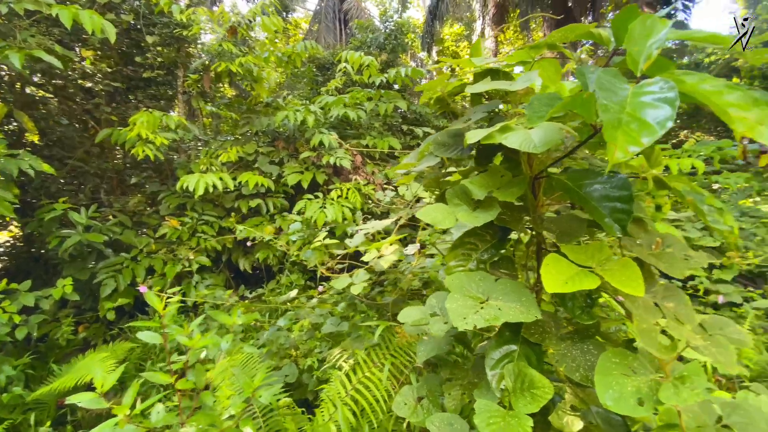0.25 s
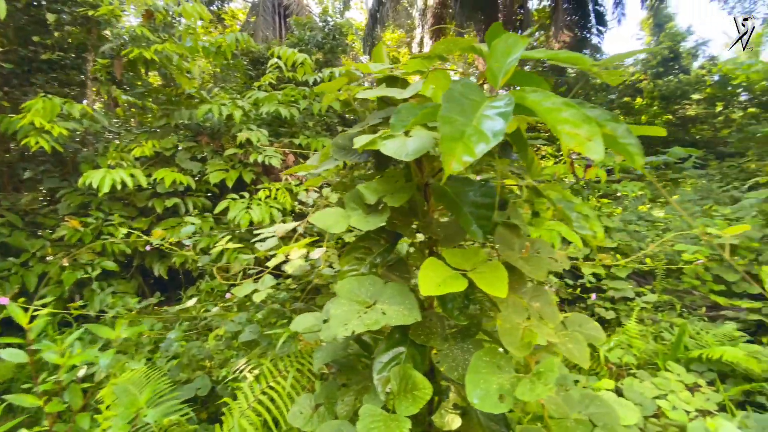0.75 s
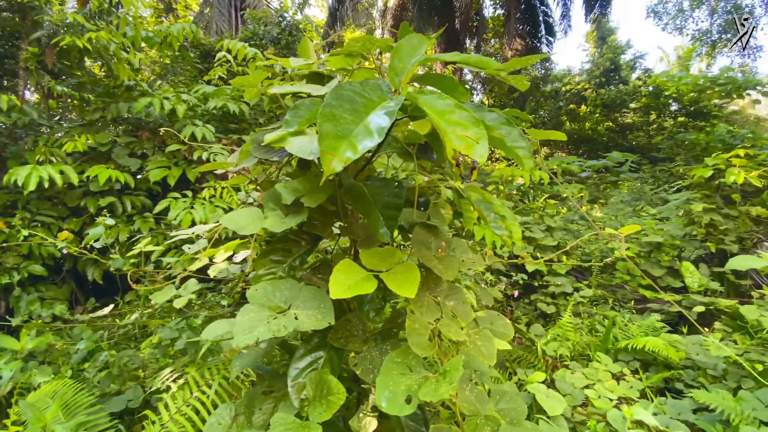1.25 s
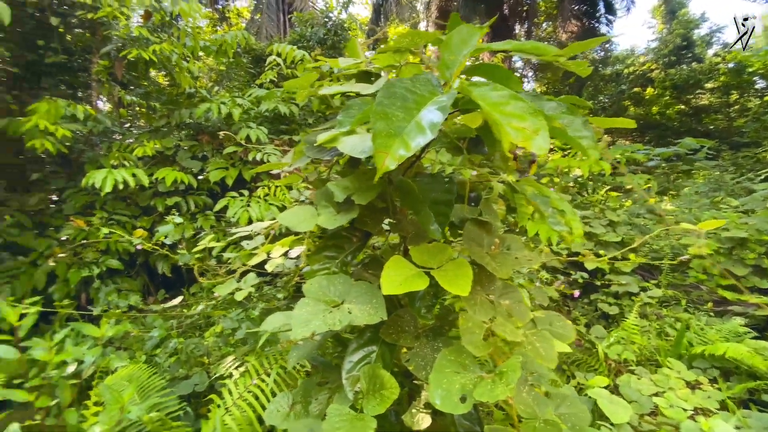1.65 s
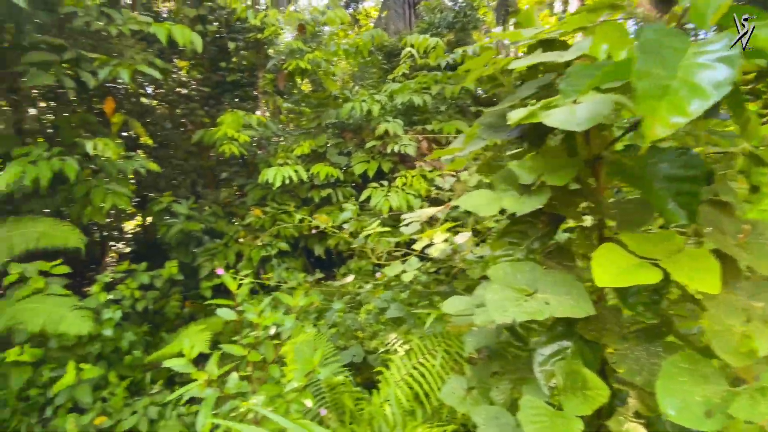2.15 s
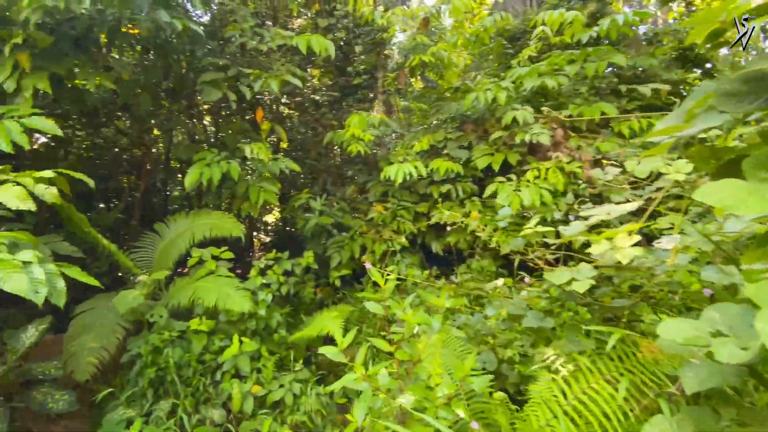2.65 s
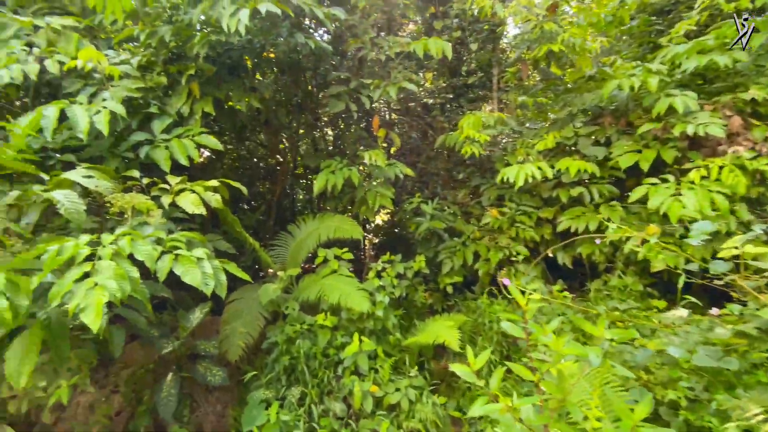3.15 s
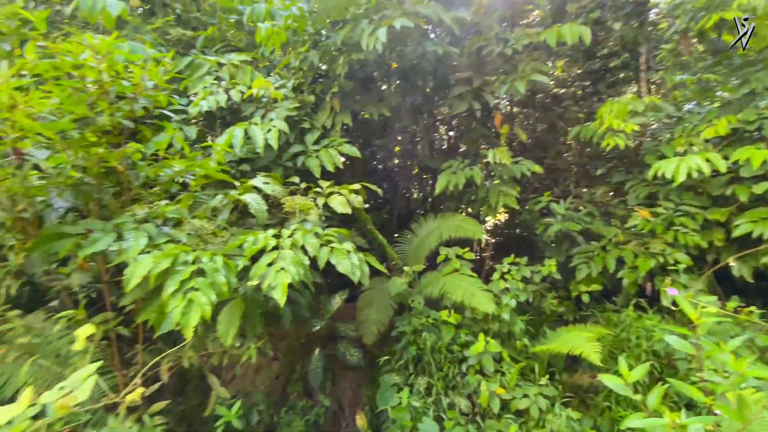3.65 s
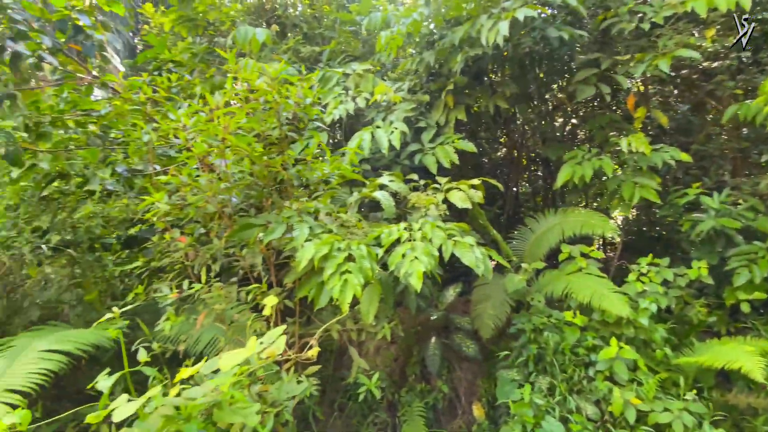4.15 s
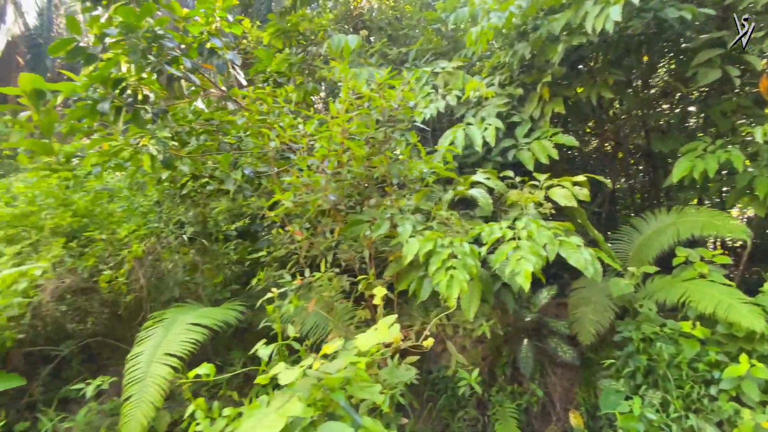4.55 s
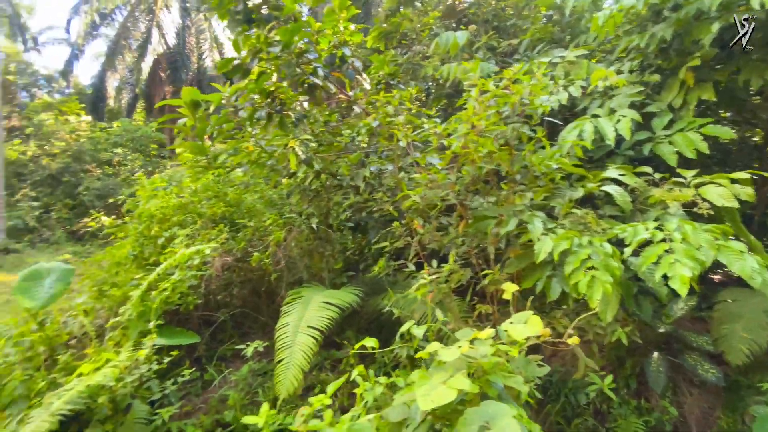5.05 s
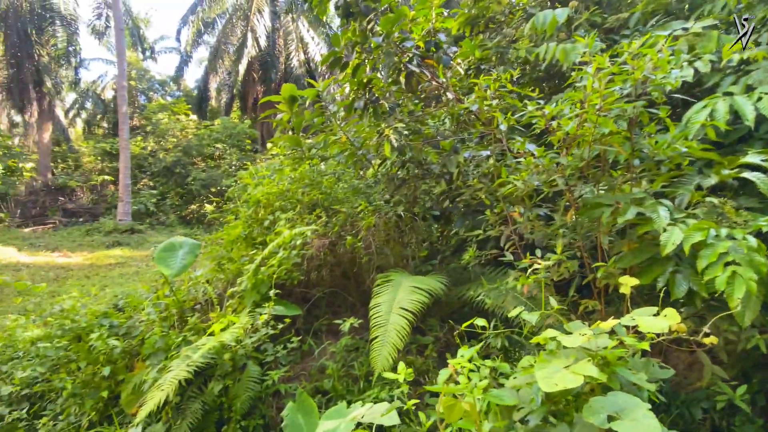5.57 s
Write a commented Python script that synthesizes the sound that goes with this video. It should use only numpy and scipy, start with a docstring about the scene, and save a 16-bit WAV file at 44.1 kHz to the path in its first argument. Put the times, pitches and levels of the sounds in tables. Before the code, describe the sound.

Heard through a phone in dense tropical foliage, a steady shrill of cicadas and trilling crickets surrounds one near cricket, whose rapid chirps grow louder toward the middle. After some soft brushing of plants come gentle footsteps, with rustling leaves, small twig snaps and two dull stick knocks. A bird slips in one brief downward whistle. Far traffic rumbles underneath the whole time.

```python
"""A cricket close by at a tropical forest edge, scraping its wings in three-stroke chirps.
The microphone is a phone, turned slowly among the leaves. Farther back are more of its kind, tree
crickets, a small triller, cicada tymbals and a high insect hiss. Plants swish, leaves and sticks give
underfoot, and a bird slurs one note. Far engines drone under the tyre wash of a distant road."""
import sys
import numpy as np
from scipy import signal
from scipy.fft import rfft, irfft, next_fast_len
from scipy.io import wavfile

SR = 44100
rng = np.random.default_rng(int(sys.argv[2]) if len(sys.argv) > 2 else 0)


def transcribe(u):
    """Save the signal u as a 16-bit wav file named by the first command-line argument.

    u: samples, shape (n,) or (channels, n), limited to [-1, 1]; the rate is SR.
    q: integer samples, one column per channel.
    """
    v = np.clip(np.atleast_2d(u).T, -1, 1)
    q = np.round(v * 32767).astype(np.int16)
    wavfile.write(sys.argv[1], SR, q)


N = 256220
T = np.arange(N) / SR
FREQS = np.maximum(np.arange(N // 2 + 1) * SR / N, 1)
SIDES = np.array([[1], [-1]])  # plus on the left, minus on the right
# the rasping cicadas and the upper part of the high insect hiss: time_s, rasp_db, upper_hiss_db
HISS_LEVELS = [(0, -54, -51), (2.2, -54, -50.5), (3.2, -49, -51.5), (4.3, -63, -53.5), (5.8, -52, -54)]


def undb(db):
    """Decibels to gain."""
    return 10 ** (np.asarray(db) / 20)


def unit(x):
    """Scale to rms 1."""
    return x / np.sqrt(np.mean(x ** 2) + 1e-18)


def curves(table):
    """Each column after the first, joined by straight lines in time."""
    times, *columns = np.transpose(table)
    return [np.interp(T, times, column) for column in columns]


def colour(x, points):
    """Filter by a spectrum of (freq_hz, gain_db) points."""
    hz, db = np.transpose(points)
    gain_db = np.interp(np.log(FREQS), np.log(hz), db, left=-90, right=-90)
    return irfft(rfft(x) * undb(gain_db), N)


def resonate(x, hz, width_hz):
    """One resonance, gain 1 at its centre."""
    return irfft(rfft(x) / (1 + 1j * (FREQS / hz - hz / FREQS) * hz / width_hz), N)


def noise():
    """Unrelated noise, left and right."""
    return rng.standard_normal((2, N))


def noise_band(hz, width_hz):
    """Noise passed twice through one resonance, at rms 1."""
    return unit(resonate(resonate(noise(), hz, width_hz), hz, width_hz))


def walk(rate):
    """Smooth chance that changes about rate times a second; spread 1."""
    size = next_fast_len(N, real=True)
    hz = np.arange(size // 2 + 1) * SR / size
    spectrum = rfft(rng.standard_normal(size)) * np.exp(-(hz / rate) ** 2)
    return unit(irfft(spectrum, size)[:N])


def phase_of(hz):
    """Phase of a moving pitch."""
    return 2 * np.pi * np.cumsum(hz) / SR


def pan(db):
    """Gains that put the left db above the right."""
    return undb(SIDES * db / 2)


def swell(u):
    """A smooth hump for u from -1/2 to 1/2."""
    return np.cos(np.pi * np.clip(u, -.5, .5)) ** 2


def swells(table):
    """One hump for each row that begins middle_s, length_s, level_db."""
    return sum(undb(db) * swell((T - s) / length) for s, length, db, *_ in table)


def foliage(x, t60):
    """Diffuse scatter from leaves and trunks, different on each side and as strong as x."""
    tail = rng.standard_normal((2, SR)) * undb(-60 * T[:SR] / t60)
    return unit(signal.fftconvolve(x[None], tail, axes=1)[:, :N]) * np.std(x)


def stridulate(chirps, pitch_ratio, scatter_db, jitter):
    """Envelope and phase of a wing scraper dragged over its file; the pitch falls as each stroke slows."""
    # strokes of one chirp: delay_s, length_s, relative_db, base_pitch_hz, base_fall_hz
    strokes = [(0, 0.01, -6.5, 7010, 500), (.0122, .0105, -1, 7080, 623), (.0262, 0.014, -1.8, 7100, 600)]
    envelope = np.zeros(N)
    hz = np.full(N, strokes[0][3] * pitch_ratio, float)
    for s, db in chirps:
        for delay, length, stroke_db, start_hz, fall_hz in strokes:
            force, detune = rng.standard_normal(2)
            a, b = np.searchsorted(T, [s + delay - length / 2, s + delay + length / 2])
            u = (T[a:b] - s - delay) / length
            envelope[a:b] += undb(db + stroke_db + scatter_db * force) * swell(u)
            glide_hz = start_hz - fall_hz * (1 - np.abs(.5 - u) ** 1.3)
            hz[a:b] = pitch_ratio * (1 + jitter * detune) * glide_hz
    return envelope, phase_of(hz)


def near_cricket():
    """Clock-like chirps close to the phone; the ground mirrors each stroke and the leaves scatter it."""
    # drift behind or ahead of the beat: time_s, lag_s
    lag = [(0, -0.002), (1.5, -0.0017), (2.4, 0.0018), (2.75, -0.00028), (3.35, -.002), (3.55, -0.0006),
           (4.1, 0), (4.45, 0.0023), (5, 0.00025), (5.8, .0005)]
    # the phone turns past gaps in the leaves: time_s, relative_db
    loudness = [(0, -40), (.17, -51), (.6, -39.5), (.72, -43), (.92, -49), (1.12, -39), (1.4, -41),
                (1.7, -43), (2.25, -35.5), (2.6, -42), (2.85, -36), (3.15, -34.5), (3.42, -32),
                (3.58, -32.5), (3.78, -36.5), (3.97, -34.5), (4.17, -41), (4.4, -35), (4.5, -36),
                (4.62, -34), (4.99, -32), (5.15, -42), (5.38, -34), (5.55, -36), (5.8, -37)]
    # the leaves shade the octave overtone: time_s, relative_db
    overtone = [(0, -17), (3.1, -24), (3.6, -10), (3.95, -15), (4.2, -3), (4.35, -4), (4.75, -4.5),
                (4.97, -12.5), (5.8, -10)]
    first_s, gap_s, hurry_s = .0293, .0592074, .00001243  # each gap is hurry_s shorter than the last
    k = np.arange(int(T[-1] / gap_s) + 2)
    starts = first_s + k * (gap_s - hurry_s * k / 2) + .00039 * rng.standard_normal(len(k))
    starts += np.interp(starts, *np.transpose(lag))
    levels = np.interp(starts, *np.transpose(loudness)) + .15 * rng.standard_normal(len(k))
    envelope, phase = stridulate(zip(starts, levels), pitch_ratio=.99, scatter_db=1.16, jitter=.003977)
    envelope *= undb(walk(368))  # uneven teeth
    phase = phase + .24 * walk(580) + .41 * SIDES  # reaches the left microphone port first
    octave = envelope * undb(curves(overtone)[0] + walk(60)) * np.sin(2 * phase)
    octave = resonate(resonate(octave, hz=13340, width_hz=1300), hz=13450, width_hz=1600)  # upper wing mode
    song = envelope * np.sin(phase) + octave
    echo_s = .0055 + .0003 * walk(3.08)  # the path changes as the phone moves
    echo = np.array([np.interp(T - echo_s, T, side) for side in song])
    reflections = undb(-12) * (echo + foliage(song[0], t60=.055))
    return undb(5) * (song + reflections) * pan(-1.8)


def hiss(spectrum, db, flutter_db, flutter_rate, shared):
    """A fluttering band of noise; part of it reaches both ports alike."""
    white = noise() + shared * rng.standard_normal(N)
    flutter = undb(flutter_db * walk(flutter_rate))
    return unit(colour(white, spectrum) * flutter) * undb(db)


def far_crickets():
    """More of the same kind deep in the bushes; the farthest smear into one narrow shrill."""
    # one cricket a row: pitch_ratio, chirps_per_s, relative_db
    singers = [(0.93, 15, -2.5), (0.98, 17.8, -1), (1, 16, -27), (0.94, 18.6, -10)]
    # spectrum of the shrill: freq_hz, relative_db
    shrill_band = [(6100, -41), (6400, -3), (6560, -6), (6640, 1), (6740, -1), (6900, -9), (7150, -30)]
    # the shrill as the phone turns: time_s, level_db
    shrill_level = [(0, -46), (2.2, -47.5), (3.3, -45), (5.8, -45.5)]
    calls = np.zeros((2, N))
    for ratio, rate, db in singers:
        starts = np.arange(rng.random() - 1, T[-1] * rate + 1) / rate
        starts += .003 * rng.standard_normal(len(starts))
        envelope, phase = stridulate([(s, db) for s in starts], ratio, scatter_db=0, jitter=.00608)
        song = envelope * np.sin(phase)
        calls += foliage(song, t60=.21) + .71 * song
    shrill = hiss(shrill_band, curves(shrill_level)[0], flutter_db=-.7, flutter_rate=30, shared=.95)
    return (undb(-51.5) * unit(calls) + shrill) * pan(-2.3)


def cicadas():
    """Countless tymbal clicks blur into hiss: a steady low and middle band, and a rasp that wanders in level."""
    # spectra, low to high: freq_hz, relative_db
    low_band = [(3700, -16), (4250, 0.5), (4660, 8.5), (5000, 0), (5400, -58)]
    mid_band = [(5400, -13.5), (6100, -5), (7000, 3.5), (7400, -2.5), (7700, 1.5), (8200, -1), (8700, 2.5),
                (9600, -4), (10700, -3), (11100, -8.5), (11500, -51)]
    rasp_band = [(7300, -25), (7700, 0), (7950, -2), (8150, -2), (8350, 1), (8700, -13), (9200, -28)]
    rasp_db, _ = curves(HISS_LEVELS)
    low = hiss(low_band, db=-59, flutter_db=1, flutter_rate=57, shared=.27) * pan(7.1)
    mid = hiss(mid_band, db=-47, flutter_db=.8, flutter_rate=64, shared=.27) * pan(-2.6)
    rasp = hiss(rasp_band, rasp_db, flutter_db=3, flutter_rate=66, shared=.21) * pan(-2.9)
    return low + mid + rasp


def high_hiss():
    """High insect hiss, and above it a faint sizzle at 14-15 kHz that grows louder late on."""
    # the hiss below 11 kHz, the hiss above 12.5 kHz and the sizzle: freq_hz, relative_db
    lower_part = [(9000, -31), (9800, -1), (10400, -3), (10900, -2.5), (11200, -12), (11500, -26)]
    upper_part = [(12250, -39), (12550, 3), (12900, 3), (13080, 3), (13300, 2), (13550, -2), (13800, -12),
                  (14600, -56), (15500, -40)]
    sizzle_spectrum = [(13500, -19), (14000, 8), (14450, 2), (15000, -17), (15500, -21)]
    # the lower part grows louder: time_s, level_db
    growth = [(0, -78), (3.1, -65), (4.3, -55), (5.8, -50)]
    lower_db, = curves(growth)
    _, upper_db = curves(HISS_LEVELS)
    lower = hiss(lower_part, lower_db, flutter_db=2, flutter_rate=160, shared=2.2) * pan(-.78)
    upper = hiss(upper_part, upper_db, flutter_db=1.1, flutter_rate=36, shared=.085)
    faint_sizzle = hiss(sizzle_spectrum, lower_db - 4.5, flutter_db=-2, flutter_rate=55, shared=.54)
    return lower + upper + faint_sizzle


def tree_crickets():
    """Short, grainy wing trills that swell, flicker and sag in pitch, over a far choir of their kind."""
    # one trill a row: middle_s, length_s, level_db, pitch_hz
    trills = [(0.057, .25, -59.5, 3195), (.15, .16, -60, 3112), (0.27, .26, -64.5, 3245),
              (0.299, .09, -60, 3105), (.47, .14, -59, 3200), (0.581, .13, -56, 3245),
              (.66, .16, -70, 3235), (0.7, 0.55, -59, 3088), (.74, .22, -67, 2990), (0.895, .07, -58, 3240),
              (.95, .1, -56.5, 3100), (1.03, .07, -59, 3225), (1.11, .07, -55, 3234),
              (1.185, .07, -53.5, 3240), (1.272, 0.098, -55, 3255), (1.44, .07, -56, 3235),
              (1.51, .09, -53.5, 3235), (1.689, 0.087, -58, 3260), (1.7, .3, -59, 3160),
              (1.928, 0.32, -65, 3257), (1.96, .24, -57, 3144), (1.971, .16, -63, 2958),
              (2.45, 0.27, -59, 3120), (2.45, 0.46, -61.5, 3230), (2.68, 0.17, -52, 3126),
              (2.69, .16, -70, 3218), (2.965, 0.18, -53, 3105), (3.02, .25, -66, 3205),
              (3.113, .15, -61, 3108), (3.42, 0.094, -59, 3235), (3.56, 0.14, -57, 3165),
              (4.08, 0.12, -57, 3168), (4.46, 0.16, -60, 3066), (4.76, 0.089, -60, 3100),
              (4.93, .3, -59, 3148), (5.18, .15, -63, 3100), (5.33, 0.14, -61, 3220),
              (5.74, 0.13, -64, 3128)]
    # spectrum of the far choir: freq_hz, relative_db
    far_band = [(2800, -41), (2980, -5.5), (3130, -9), (3230, 6.5), (3310, -19.5), (3480, -5), (3700, -28)]
    # the phone turns away from that choir: time_s, level_db
    far_level = [(0, -59.5), (1.5, -58.5), (2.7, -60.5), (3.6, -59.5), (5.8, -87)]
    strokes_per_s, stroke_depth, sag_hz_per_s = 90, .42, 35
    stroke_phase = phase_of(strokes_per_s * (1 + .035 * walk(13)))
    waver_hz = 10.8 * walk(66)
    rough_rad = .33 * walk(140)  # uneven teeth
    flicker = unit(undb(2.2 * walk(55)))
    out = np.zeros((2, N))
    for s, length, db, hz in trills:
        offset, bearing = 2 * np.pi * rng.random(2)
        a, b = np.searchsorted(T, [s - length / 2, s + length / 2])
        t = T[a:b] - s
        envelope = undb(db) * np.sqrt(2 * swell(t / length)) * flicker[a:b]
        grain = 1 + stroke_depth * np.sin(stroke_phase[a:b] + offset)
        phase = phase_of(hz - sag_hz_per_s * t + waver_hz[a:b]) + rough_rad[a:b] + offset
        out[:, a:b] += envelope * grain * np.sin(phase + .82 * np.sin(bearing) * SIDES)
    far = hiss(far_band, curves(far_level)[0], flutter_db=-1, flutter_rate=93, shared=.7)
    return out + undb(-7.5) * foliage(out[0], t60=.32) + far


def small_cricket():
    """A soft, high, unbroken trill of short wing strokes, each falling in pitch."""
    # phrases in which it swells: middle_s, length_s, level_db, pitch_hz
    phrases = [(0.549, 1.33, -59, 8297), (2.781, 0.74, -52.5, 8276), (3.37, 0.6, -52, 8450),
               (3.872, 0.43, -52.5, 8400), (4.98, .3, -56, 8370), (5.776, .5, -52, 8760)]
    strokes_per_s, fall_hz, floor_db = 58, 605, -81
    stroke_count = phase_of(strokes_per_s * (1 + .006 * walk(3.9))) / (2 * np.pi)
    u = stroke_count % 1 - .5  # place within the stroke
    hz = curves(phrases)[-1] - fall_hz * u + 40 * walk(198)
    loudness = undb(floor_db) + swells(phrases)
    trill = unit(swell(u / .76) * np.sin(phase_of(hz))) * loudness
    return trill + undb(-8) * foliage(trill, t60=.045)


def engines():
    """Two far engines beat, one gathering speed, one steady; only their lowest firing tones carry."""
    # each tone's rise and fall: time_s, first_relative_db, first_octave_relative_db, second_relative_db
    loudness = [(0, -45.5, -43.5, -44), (.5, -42.5, -46, -47), (.8, -50, -53.5, -43.5),
                (1.3, -41.5, -48, -41), (1.72, -45, -50.5, -47), (2.15, -45, -43, -43),
                (2.55, -45, -47, -44), (2.85, -39.5, -41.5, -40), (3.3, -43.5, -47, -41.5),
                (3.65, -46, -57, -44), (4.15, -46, -42.5, -37.5), (4.55, -47, -47, -45),
                (4.85, -42, -48, -43.5), (5.3, -42, -44, -38), (5.75, -42, -51, -37.5)]
    first_hz, rise_hz_per_s, second_hz = 52.36, .72, 60.4
    first_db, octave_db, second_db = curves(loudness)
    phase = phase_of(first_hz + rise_hz_per_s * T + .22 * walk(3.17)) - .25 * SIDES
    first = undb(first_db + 1) * np.sin(phase) + undb(octave_db + 4.5) * np.sin(2 * phase)
    phase = phase_of(second_hz + .43 * walk(5.43)) - .4 * SIDES
    second = undb(second_db + .57 * walk(6.3)) * (np.sin(phase) + undb(-13.5) * np.sin(2 * phase))
    return (first + second) * pan(-6.5)


def traffic():
    """A distant road: a wide rumble and a wash of tyres, each wavering on its own as it grows."""
    # spectrum of the road: freq_hz, relative_db
    road_band = [(20, -28), (40, -1.5), (55, 3.5), (76, 7.5), (92, 3.5), (125, 1), (190, -8), (300, -6.5),
                 (750, -5.5), (1150, -8), (1700, -15), (2500, -23.5), (3000, -22.5), (3800, -27.5),
                 (6000, -30.5), (12000, -76)]
    # its stereo width: freq_hz, side_minus_mid_db
    width = [(40, 7), (100, 1), (170, 7), (350, 2.5), (700, 6), (1200, 3), (2200, 0), (8000, 3)]
    # rise of the tyre wash: time_s, gain_db
    wash_gain = [(0, -45), (.6, -45), (.92, -43.5), (1.1, -44.5), (1.8, -43), (2.45, -43.5), (2.9, -43),
                 (3.6, -42.5), (4.05, -41), (4.8, -41.5), (5.4, -41.5), (5.8, -40.5)]
    crossover_hz, rise_db_per_s = 370, .25
    mid, side = colour(noise(), road_band)
    side = colour(side, [(20, -15)] + width + [(20000, 0)])
    road = (mid + side * SIDES) / np.std(mid)
    rumble = irfft(rfft(road) / (1 + (FREQS / crossover_hz) ** 4), N)
    wash = road - rumble
    rumble_db = -44.5 + rise_db_per_s * T + 2.1 * walk(7.6)
    wash_db = curves(wash_gain)[0] + 1.35 * walk(24)
    return rumble * undb(rumble_db) * pan(.19) + wash * undb(wash_db) * pan(-1.65)


def swishes():
    """Soft plants bend and slide past, as when legs push through them."""
    # one push a row: middle_s, length_s, level_db
    pushes = [(.33, .3, -45), (.72, 0.2, -50), (0.908, 0.087, -51), (1.792, 0.21, -47), (2.617, 0.076, -41),
              (2.85, 0.42, -52), (4.25, 0.3, -58)]
    # their dull spectrum: freq_hz, relative_db
    plant_band = [(130, -10), (280, 2.5), (550, 2), (900, -0.5), (1500, -26), (3000, -26)]
    return swells(pushes) * unit(colour(noise(), plant_band))


def rumble_swells():
    """The far rumble surges softly now and then."""
    # one surge a row: middle_s, length_s, level_db
    surges = [(0.686, 0.42, -48.5), (3.0, 0.2, -50), (3.187, 0.37, -54), (5.404, 0.31, -48.5),
              (5.66, 0.39, -47.5)]
    return swells(surges) * noise_band(hz=206, width_hz=140)


def leaf_litter():
    """Steps crush damp leaves in soft bursts of tiny cracks; now and then a twig snaps."""
    # leaves brushed and trodden: middle_s, length_s, level_db
    rustles = [(2.131, 0.23, -47.5), (2.266, 0.3, -50), (2.412, 0.28, -47.5), (3.252, 0.48, -50.5),
               (3.423, 0.36, -54), (3.793, 0.25, -48), (4.046, 0.23, -58), (4.335, 0.4, -53),
               (4.882, 0.4, -48.5), (5.049, 0.21, -53), (5.264, 0.31, -51.5)]
    # spectrum of crushed leaves: freq_hz, relative_db
    leaf_band = [(400, -36), (1000, 2), (1700, 2), (2800, -4.5), (5500, -4.5), (9000, -33), (11000, -33),
                 (15000, -55)]
    # twigs snapping: start_s, relative_peak_db, resonance_hz
    twigs = [(2.11, -36, 1600), (2.136, -33, 1200), (2.157, -37, 1650), (2.369, -34.5, 1680),
             (3.792, -37.5, 1890), (3.824, -39, 1000), (4.025, -37, 1086), (4.423, -37, 1004),
             (4.797, -31, 1250), (5.039, -33, 1950)]
    cracks_per_s, snap_decay_s = 6000, .0049
    cracks = noise() * (rng.random(N) < cracks_per_s / SR)
    cracks *= undb(2 * np.minimum(rng.exponential(size=N), 4))  # a few stand out
    out = swells(rustles) * unit(colour(cracks, leaf_band))
    for s, db, hz in twigs:
        burst = noise() * (T >= s) * np.exp(-np.abs(T - s) / snap_decay_s)
        snap = resonate(resonate(burst, hz, width_hz=1000), hz, width_hz=1800)
        out += undb(db + 3) * snap / np.abs(snap).max()
    return out


def stick_knocks():
    """A foot meets a damp stick, which rings briefly in a few dull modes."""
    # one knock a row: start_s, peak_db
    knocks = [(2.457, -26), (2.604, -28.5), (3.791, -40)]
    # modes of the stick: pitch_hz, t60_s, relative_db
    modes = [(490, 0.028, -3), (674, 0.016, 2), (1050, 0.011, -5), (1500, 0.015, -2), (1820, 0.011, -8)]
    age = T[:SR // 5]
    ring = sum(undb(db - 60 * age / t60) * np.sin(2 * np.pi * hz * age) for hz, t60, db in modes)
    out = np.zeros(N)
    for s, db in knocks:
        a = int(s * SR)
        out[a:a + len(ring)] += undb(db) * ring / np.abs(ring).max()
    return out * pan(-2.49) + undb(-15) * foliage(out, t60=.08)


def footfalls():
    """Weight settles on soft ground with a low thud."""
    # one step a row: middle_s, length_s, level_db
    thuds = [(2.69, 0.25, -43), (2.877, 0.49, -45), (3.238, 0.16, -54), (4.148, 0.22, -41),
             (5.711, 0.42, -53)]
    return swells(thuds) * noise_band(hz=98.5, width_hz=156)


def bird():
    """One quavering whistle that drops quickly, is loudest in mid-fall and fades as it levels out."""
    start_s, attack_s, decay_s = 3.227, .035, .038
    start_hz, end_hz, glide_s = 4400, 3230, .042
    age = np.maximum(T - start_s, 0)
    hz = end_hz + (start_hz - end_hz) * np.exp(-age / glide_s) + 30 * walk(120)
    envelope = np.minimum(age / attack_s, np.exp((attack_s - age) / decay_s))
    note = np.sin(phase_of(hz)) * envelope * undb(-43 + 2.6 * walk(90))
    return note + undb(-7) * foliage(note, t60=.25)


def scene():
    """Insects all round, the bird, steps close by and the road far off."""
    crickets = near_cricket() + far_crickets() + tree_crickets() + small_cricket()
    forest = crickets + cicadas() + high_hiss() + bird()
    steps = leaf_litter() + stick_knocks() + swishes() + footfalls()
    road = engines() + traffic() + rumble_swells()
    return forest + steps + road


def record(dry):
    """The phone cuts the top of the treble steeply."""
    top_hz = 15500
    return signal.sosfilt(signal.ellip(8, .2, 80, top_hz, fs=SR, output="sos"), dry)


dry = scene()
out = record(dry)
transcribe(out)
```